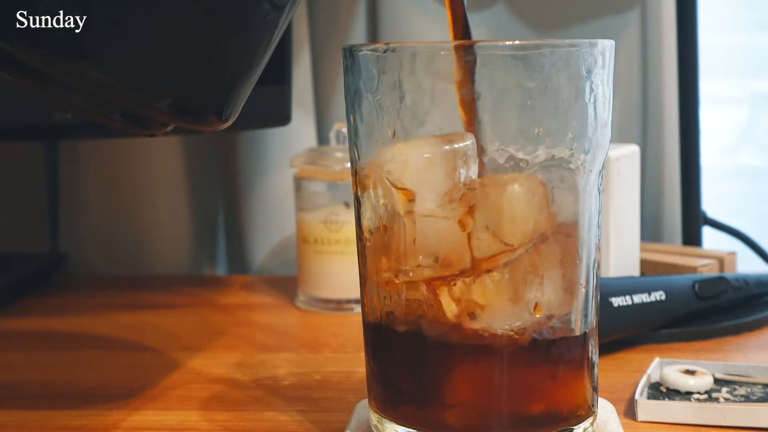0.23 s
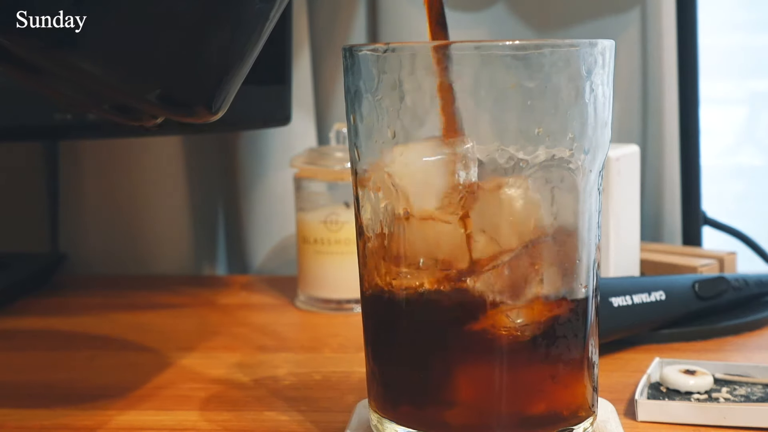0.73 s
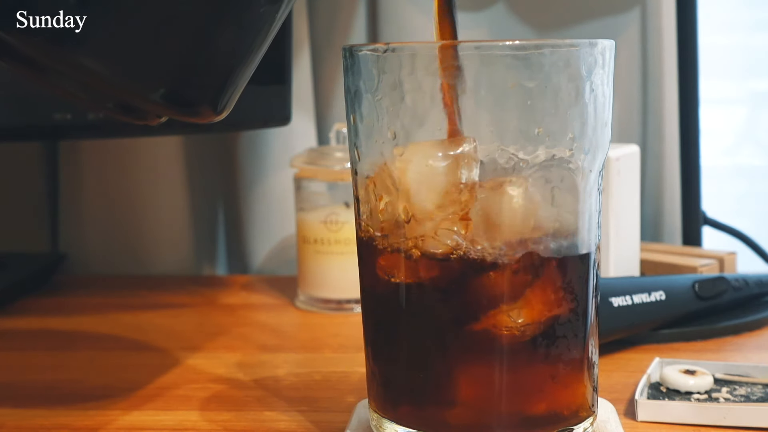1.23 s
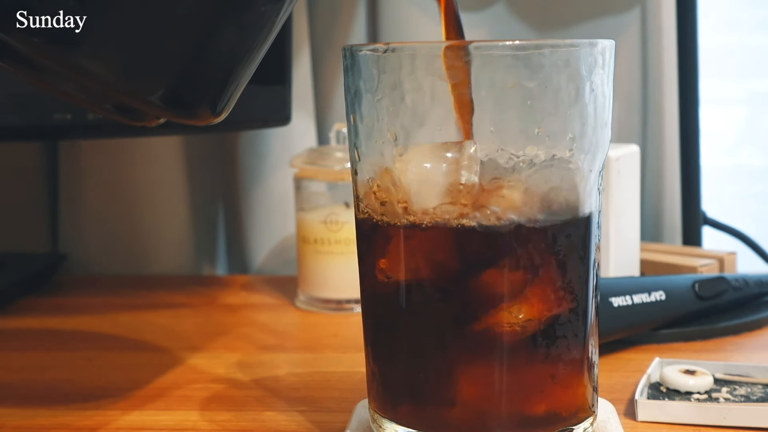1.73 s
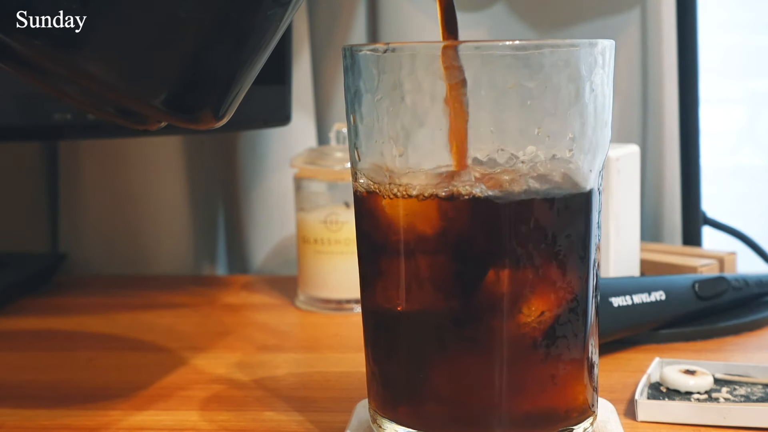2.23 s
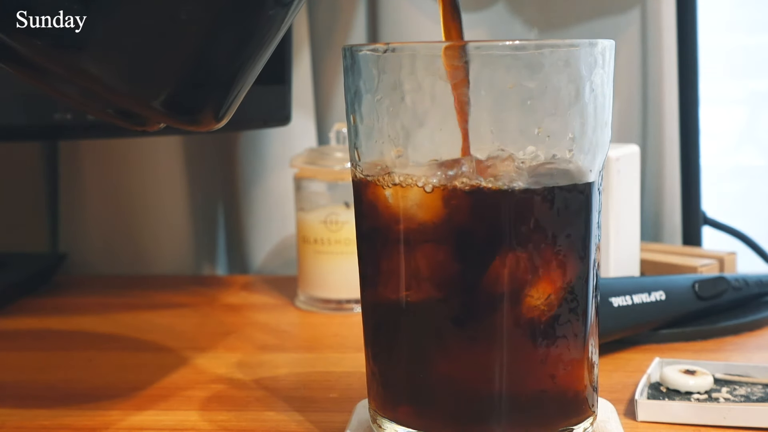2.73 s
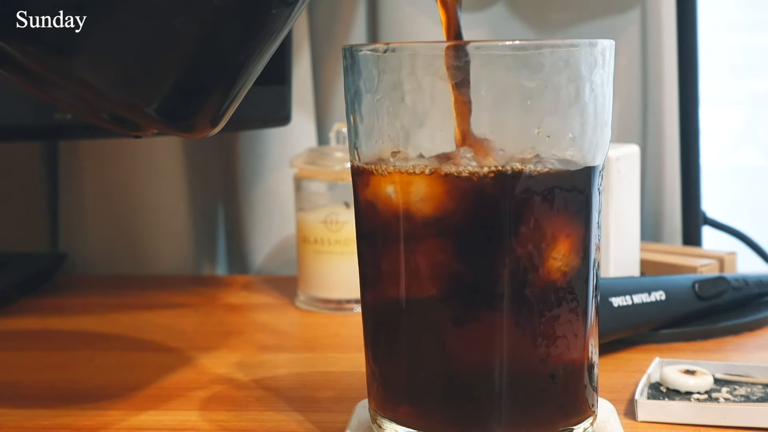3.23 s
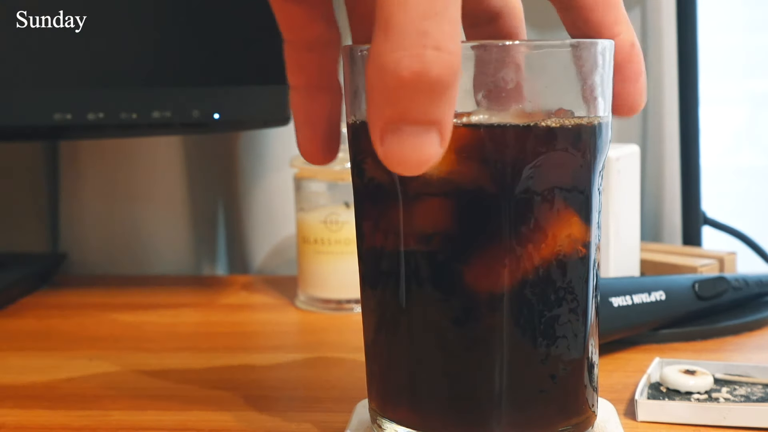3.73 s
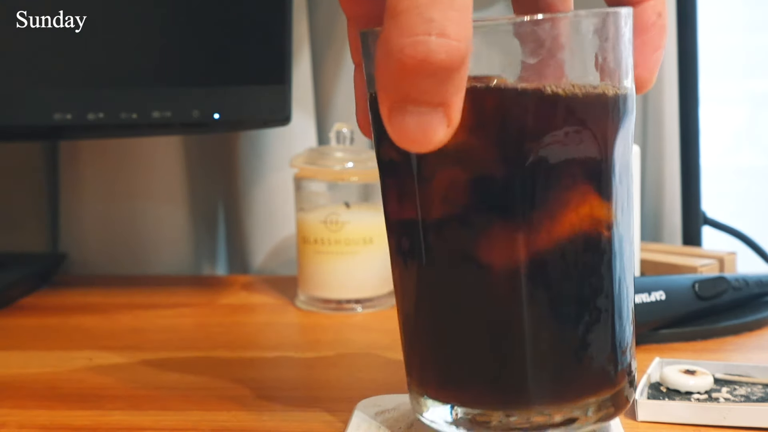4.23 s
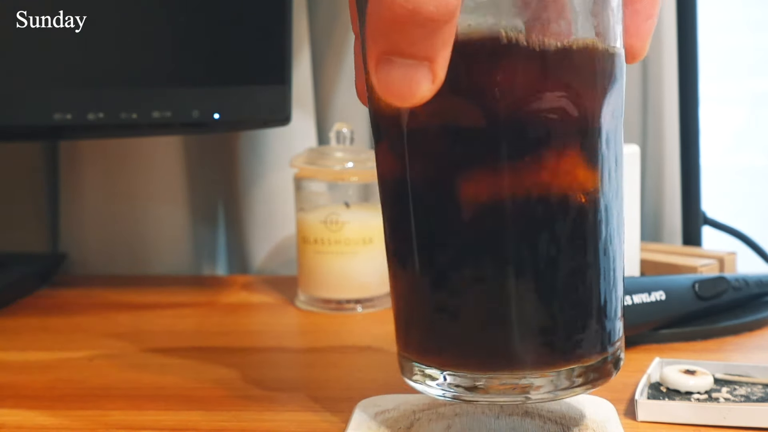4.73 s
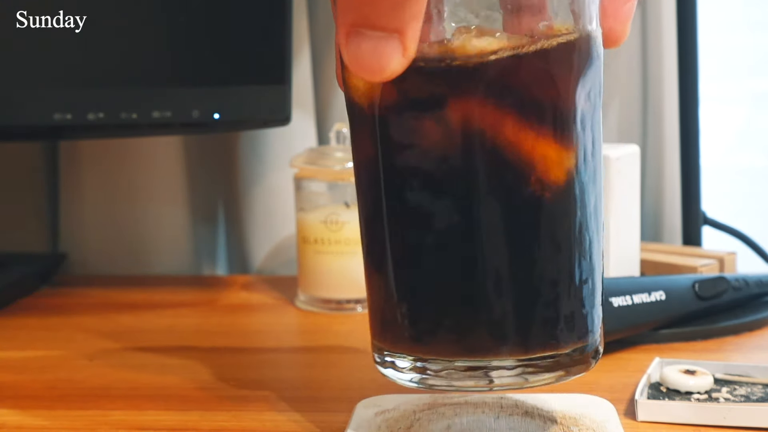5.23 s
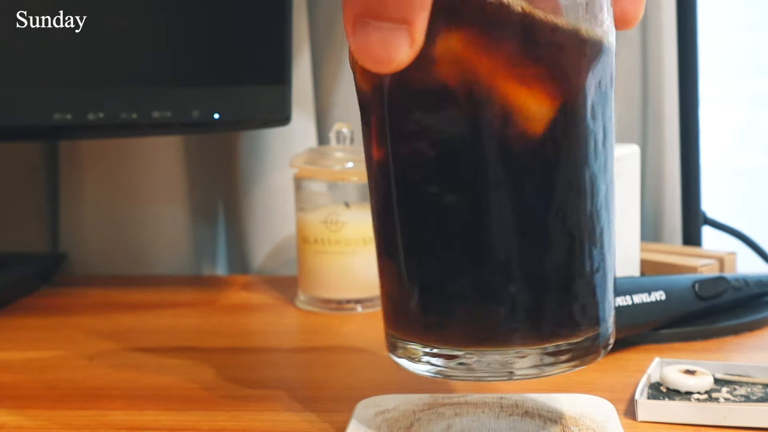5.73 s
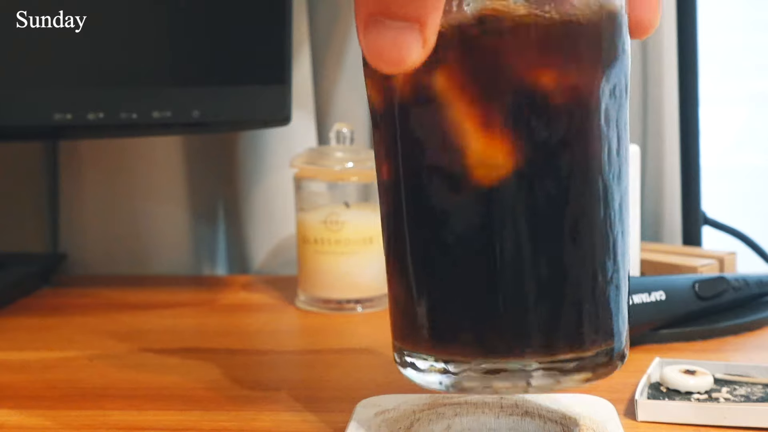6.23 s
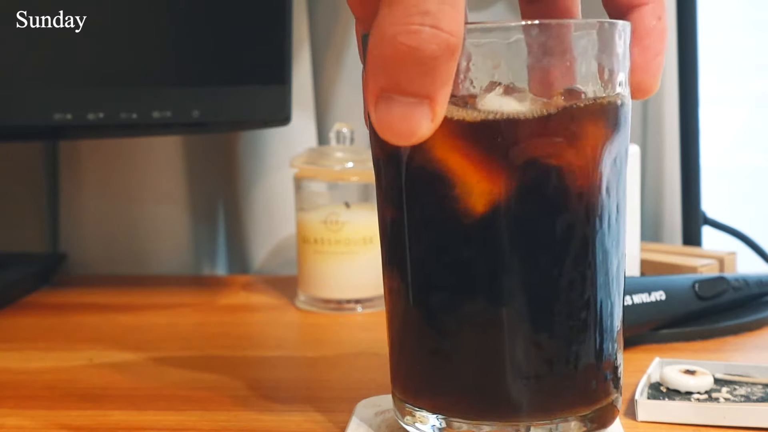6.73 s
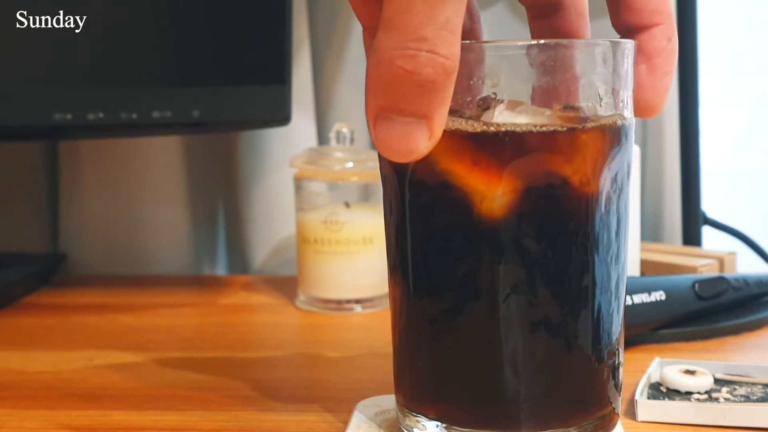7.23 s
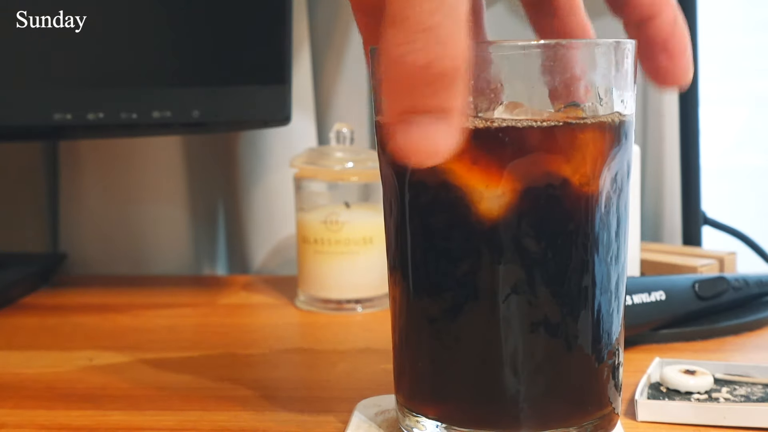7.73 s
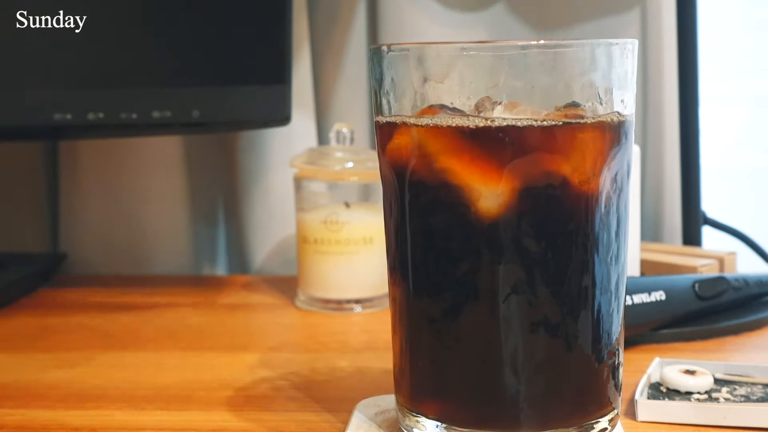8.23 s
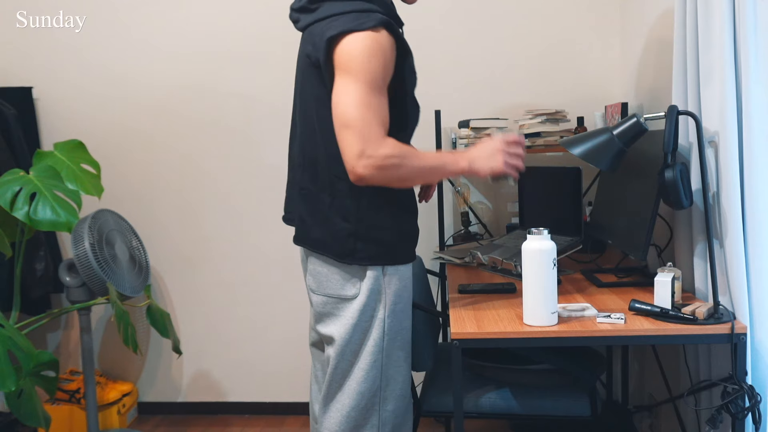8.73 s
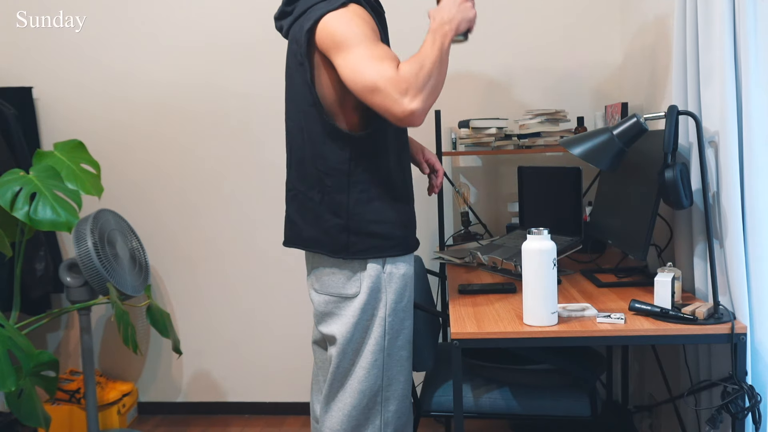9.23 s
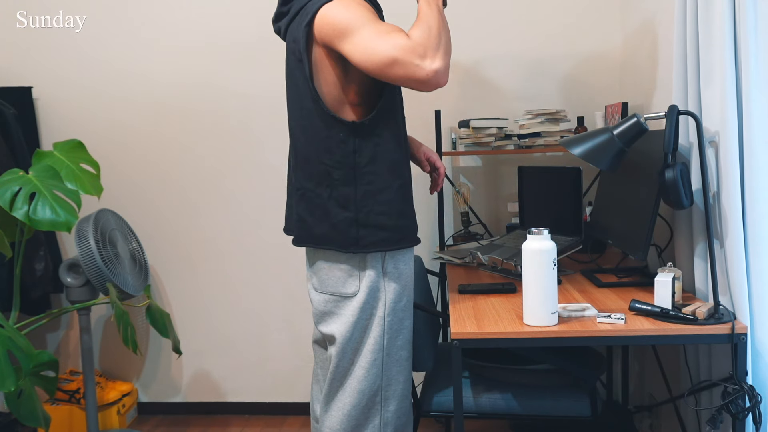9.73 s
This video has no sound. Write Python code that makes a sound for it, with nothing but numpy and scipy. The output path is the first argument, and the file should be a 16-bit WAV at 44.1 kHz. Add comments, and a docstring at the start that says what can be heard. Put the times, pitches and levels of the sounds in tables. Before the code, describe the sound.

Close-up iced drink pour with bubbling and fizzing spray, a thumb tap, vigorous glassy ice swirling, a coaster thump, then soft ice clinks across a room.

```python
"""Ice clinks against the wall of a tall glass, swirled so close to the microphone that it overloads the input.
Before that, a dark drink is poured over the cubes on a wooden desk: the stream gurgles, spits and sprays, cubes
slip, and a finger taps the glass. The glass also thumps its coaster. Last, ice tinkles across the small room.
Glass and desk are decaying sines, ice contacts are noise bursts through resonances, the drink is random drops
and bubbles, and the room is coloured noise."""
import sys
import numpy as np
from scipy import signal
from scipy.fft import rfft, irfft
from scipy.io import wavfile

SR = 44100
rng = np.random.default_rng(int(sys.argv[2]) if len(sys.argv) > 2 else 0)


def generate_wav(sig):
    """Save sig (samples, or channels by samples) to the path in sys.argv[1] as 16-bit PCM at SR."""
    pcm = np.round(np.clip(np.atleast_2d(sig).T, -1, 1) * 32767).astype(np.int16)
    wavfile.write(sys.argv[1], SR, pcm)


N = 441000
TIME = np.arange(N) / SR   # s

# All levels in the tables are relative, within their own layer.
# room noise of a brief quieter opening, stepping up at about 0.1 s to that at the desk: [time_s, level_db]
AIR_LEVEL = [(0, -11.5), (.098, -7), (.106, 0.2)]
# rumble and hiss at the desk, then across the room: [pitch_hz, density_db_per_hz]
NEAR_LOW = [(30, -29), (48, -9), (62, -1), (100, -8), (143, 3), (180, -4.5), (235, 0), (330, -6.5),
            (450, -15.5), (560, -29.5), (700, -39)]
NEAR_HISS = [(500, -4.5), (700, -3), (950, 4), (1200, -2.5), (1500, 5), (2400, 1.5), (3300, -4.5),
             (6000, -6.5), (15500, -5.5)]
FAR_LOW = [(30, -26), (50, -7.5), (100, -4), (145, -0.5), (200, 1), (290, -1), (380, -8.5), (480, -12),
           (580, -25.5), (720, -38.5)]
FAR_HISS = [(500, 4), (720, 5), (950, 15.5), (1400, 19), (1900, 13.5), (2500, 10), (3400, 3), (6000, -8),
            (15500, -1.5)]
MAINS_HZ, ACROSS_ROOM_S = 50.2, 8.31

# cubes slipping in the nearly empty glass: [start_s, contact_db, wall_ring_db, base_thump_db]
SLIPS = [(0.216, 5, -20.5, -15), (0.286, -14, -54, -24), (0.445, 1.5, -18.5, -26.5), (1.024, -16, -31, -44),
         (1.074, -12.5, -40, -50)]
# wall of the nearly empty glass: [pitch_hz, level_db, t60_s]
EMPTY_GLASS = [(1766, -13, 0.13), (4019, 8, 0.11), (6560, -7, .025), (7100, -24, 0.12),
               (9950, -13.5, 0.064)]
# the glass rocking on its base, with the air inside it: [pitch_hz, level_db, t60_s]
BASE_MODES = [(163, -7, 0.12), (237, -3, 0.13), (319, 1.5, 0.23), (461, -4, 0.078), (967, 5, 0.044),
              (1049, 6, 0.074), (1210, -1, 0.075)]
# the stack of cubes and the air around it: [pitch_hz, width_hz, level_db]
STACK = [(950, 70, 3), (1210, 70, -2), (1756, 204, 7.5), (2520, 310, 2), (3200, 360, -6), (3700, 800, -11),
         (6330, 440, -11.5)]

# the stream wavers, plunging into the drink or spattering on a cube:
# [centre_s, half_length_s, gurgle_rise_db, spray_rise_db]
SURGES = [(0.1, .03, 10, -4), (0.198, .03, 5.5, 8), (0.567, 0.045, 3, -1.5), (0.822, 0.037, 13.5, 1),
          (0.923, 0.11, -9, 8), (1.424, .08, 7, -1.5), (1.604, 0.017, 7, 14), (1.74, 0.059, 3, 16.5),
          (1.92, 0.16, 16, 4.5), (2.292, 0.042, 6, 13), (2.623, 0.15, -1, 5), (2.987, 0.075, 8.5, 6.5),
          (3.335, 0.073, 13.5, 7)]
# air above the drink: [pitch_hz, width_hz, level_db]
CAVITY = [(896, 127, -6), (1059, 65, 1.5), (1210, 57, 5), (1510, 91, 0), (1710, 80, 0), (2050, 140, -9),
          (3300, 250, -8)]
# fizz of the spray: [pitch_hz, density_db_per_hz]
SPRAY_SPECTRUM = [(4700, -12), (5300, -8), (5700, -19), (6250, 6.5), (6900, -19), (7550, 2.5), (7900, -8),
                  (8500, 1), (10000, -3.5), (13000, -6.5), (16000, -39)]
# the largest gulps of air dragged under: [start_s, level_db, pitch_hz]
GULPS = [(0.5584, -19, 1070), (0.782, -22, 1110), (0.9048, -19, 2550), (1.107, -18.5, 3000),
         (1.1453, -23, 1760), (1.3354, -18.5, 2690), (1.4157, -19.5, 1210), (1.457, -21, 1210),
         (1.492, -16, 1210), (1.702, -19.5, 1080), (1.8312, -14.5, 1190), (1.8614, -12.5, 2980),
         (1.9215, -18, 1610), (1.937, -14, 3760), (2.0184, -22, 1650), (2.9555, -12.5, 1104),
         (3.043, -18.5, 1470), (3.251, -21.5, 1480), (3.3406, -17, 1210), (3.3734, -20, 1470)]
# the loudest drops spitting off the ice: [start_s, level_db]
SPITS = [(0.618, -20.5), (0.658, -23), (0.9416, -20), (1.7524, -15), (1.7714, -20), (2.9483, -20),
         (3.3199, -15.5)]
SPIT_CENTRE_HZ = 6280
POUR_START_S, POUR_END_S = .103, 3.396
# levels of the stream between surges (dB); the spray level is that before its drops and fizz are balanced
GURGLE_DB, BUBBLE_DB, SPRAY_DB = -47.5, -44.5, -53
# bubble pings fade as the glass fills: from (s), rate (dB per s), share of a surge's dB that they follow
BUBBLES_FADE_S, BUBBLE_FADE_DB_PER_S, BUBBLE_FOLLOWS = 1.1, 4.5, 0.27

# thumps of the desk, under the finger tap (first row), then as glass meets coaster: [start_s, level_db]
THUDS = [(3.954, -26), (7.002, -12), (7.0098, -15)]
# desk top: [pitch_hz, level_db, t60_s]
DESK_MODES = [(87, -18.5, 0.98), (144.3, -1, 0.19), (226, -2.5, .09), (293.4, -4, 0.11),
              (362, -13.5, 0.074), (470, -13, 0.082), (685, -14.5, .02), (920, -11.5, 0.011)]

# a finger tap on the glass (first row), then clear blows of ice on the full glass:
# [start_s, knock_db, wall_ring_db, upper_ring_over_wall_ring_db]
CLINKS = [(3.956, -30.5, -43, 6), (4.1698, -41, -38.5, -2), (4.2275, -26.5, -19.5, 2),
          (4.2703, -25, -15, -2.5), (4.3242, -28, -13.5, -12), (4.4028, -12, -11.5, -5),
          (4.4229, -14, -10.5, 6), (4.444, -9, -21, -4), (4.4748, -14, -21, -13), (4.521, -0.5, -16.5, 0),
          (4.5425, -16, -14.5, -8), (4.5682, -8, -1, -1.5), (4.5801, -10, 0, -2.5),
          (4.6497, -22, -15.5, -2.5), (4.673, -11.5, -6.5, -1), (4.7026, -2, -7.5, -9),
          (4.7254, -5.5, -1, -12), (4.7375, -9.5, -13, -27), (4.7906, -17, -17, 6.5), (4.8124, -8, -13, -1),
          (4.8305, -18, -16, 6), (4.86, -23, -15, -3), (4.89, -5.5, -12, -5), (4.9362, -7.5, -11, -4),
          (5.0144, -16.5, -22.5, -10), (5.0528, -7, -24, -5), (5.1151, -13, -14.5, -2),
          (5.1989, -10, -20, -15), (5.2281, -18, -9.5, -3.5), (5.3194, -11.5, -18, -14),
          (5.3567, -18, -17.5, -3), (5.4145, -14.5, -24, -12), (5.4561, -11.5, -13.5, -2),
          (5.5239, -10, -11, 0.5), (5.5631, -22, -28, -13), (5.6055, -23, -19.5, -1), (5.631, -22, -16, 0),
          (5.661, -16, -6.5, 0.5), (5.6984, -19, -5, -5), (5.7584, -5, -11, 6.5), (5.7918, -1.5, -13.5, -7),
          (5.8428, -12, -10, 0), (5.872, -28.5, -15.5, 13.5), (5.9488, -24, -14.5, 15.5),
          (5.9831, -17.5, -8, 2.5), (6.0609, -2.5, -15.5, -22), (6.0817, -22, -8, -4),
          (6.142, -10, -11.5, -5), (6.1709, -15, -17, 11), (6.1913, -8.5, -26, -5), (6.2402, -15, -7.5, 1),
          (6.2492, -17.5, 2, 1), (6.2921, -5.5, -9, -16), (6.3092, -7, -16, -4), (6.398, -34, -6.5, 0.5),
          (6.4192, -5.5, -8.5, 7), (6.5148, -28, -14.5, 0), (6.534, -24, -10.5, 5.5),
          (6.5827, -13, -9.5, -13), (6.6031, -21, -12.5, -8), (6.625, -6, -26, -12),
          (6.6619, -26, -13, -1.5), (6.7492, -22, -20.5, -13), (6.8149, -21, -17, -34),
          (6.8565, -33, -24, -11), (6.9066, -18, -15.5, -9), (6.9521, -12, -22.5, 0),
          (7.0582, -32, -15, -21), (7.1402, -36, -32, -7), (7.176, -33, -23.5, -21), (7.1973, -24, -29, -5),
          (7.3236, -38, -34.5, -8), (7.5996, -34, -41, -19)]
# the swirl starts, is under way, slackens, stops: [time_s]
SWIRL_S = [4.1, 4.45, 6.6, 7.2]
# wall of the full glass, pitch and t60 scattered from blow to blow: [pitch_hz, level_db, t60_s]
FULL_GLASS = [(1341.7, 7.5, 0.11), (1617, -6, 0.043), (2364, -10, 0.054), (3170, 8, 0.034),
              (3160, -21.5, .13), (4753, 2.5, 0.017), (5032, -1.5, 0.024), (5800, -19.5, .025),
              (8050, -18.5, 0.025), (9820, -24.5, 0.023)]
# the wall's main pitch as the drink is tilted, before scatter: [time_s, pitch_hz]
WALL_PITCH = [(4.3, 3220), (5.8, 3180), (6.1, 3130), (7.1, 3157)]
SLOSH = 0.032   # share by which sloshing scatters the main pitch
# the dead knock of a blow: [pitch_hz, width_hz, level_db]
KNOCK_MODES = [(1560, 400, -13), (2520, 540, -3), (3250, 500, 4), (5100, 1000, -7), (8300, 1500, -18.5)]
# added to each blow's knock, main ring and upper ring (dB)
KNOCK_DB, RING_DB, UPPER_DB = 9.5, -6, -4
# the wall's lowest mode: level (dB) and the share of a blow's ring dB that it follows
LOW_RING_DB, LOW_RING_FOLLOWS = -18, .72
# rebound after a blow: centre delay (s), loss of knock and of ring (dB) before scatter
REBOUND_S, REBOUND_KNOCK_LOSS_DB, REBOUND_RING_LOSS_DB = .014, 9.5, 13
# a light touch on the wall falls within this window after the blow (s)
TOUCH_FROM_S, TOUCH_UNTIL_S = .018, .045
# light touches on the scale of CLINKS: knock, ring and their spread (dB)
TOUCH_KNOCK_DB, TOUCH_RING_DB, TOUCH_SPREAD_DB = -21.5, -28, 6

# ice heard from across the room: [start_s, level_db, brightness_db]
FAR_CLINKS = [(8.3147, -39, -5.5), (8.522, -28, -20.5), (8.7, -25, -4.5), (8.8835, -21.5, -30),
              (8.9411, -29.5, -20), (8.98, -28, -3.5), (9.178, -22.5, -5), (9.2792, -34.5, -10),
              (9.387, -22.5, -29), (9.9555, -35.5, -28)]
# the glass held in the hand: [pitch_hz, width_hz, level_db]
HELD_GLASS = [(1256, 60, -14), (3080, 260, 5), (4810, 190, 11), (5160, 340, 7.5), (5610, 320, 8),
              (8540, 860, -5.5)]
CUTOFF_HZ = 16000   # top of the microphone chain


def from_db(db):
    """Decibels to gain."""
    return 10 ** (np.asarray(db) / 20)


def rms_one(x):
    """Scale to unit rms."""
    return x / np.sqrt(np.mean(x ** 2) + 1e-20)


def at_hz(points, hz):
    """Read a spectrum on a log-frequency axis."""
    pitch_hz, db = np.transpose(points)
    return np.interp(np.log(hz + 0.0011), np.log(pitch_hz), db)


def add(track, s, sound):
    """Mix a sound into a track at time s."""
    i = max(0, round(s * SR))
    track[i:i + len(sound)] += sound[:max(0, N - i)]


def dying(t60):
    """An exponential fade that drops 60 dB in t60 seconds."""
    return from_db(-60 * TIME[:int(1.2 * t60 * SR) + 2] / t60)


def ping(hz, t60, rise=0):
    """A decaying sine; a positive rise bends the pitch upward, as for a bubble nearing the surface."""
    fade = dying(t60)
    t = TIME[:len(fade)]
    return fade * np.sin(2 * np.pi * hz * t * (1 + rise * t / t60))


def contact(t60):
    """A decaying noise burst of unit energy, for the micro-contacts of one touch."""
    fade = dying(t60)
    burst = fade * rng.standard_normal(len(fade))
    return burst / np.sqrt(np.sum(burst ** 2))


def cut(x, hz, kind, order=2):
    """Butterworth high- or low-pass."""
    sections = signal.butter(order, min(hz, .45 * SR), kind, fs=SR, output="sos")
    return signal.sosfilt(sections, x + 1e-18)


def resonate(x, modes):
    """Parallel two-pole resonances with alternating signs."""
    out = 0
    for k, (hz, width, db) in enumerate(modes):
        r = np.exp(-np.pi * width / SR)
        poles = [1, -2 * r * np.cos(2 * np.pi * hz / SR), r * r]
        gain = (-1) ** k * from_db(db) * (1 - r * r) / 2
        out = out + gain * signal.lfilter([1, 0, -1], poles, x + 1e-18)
    return out


def coloured(x, spectrum):
    """Give a steady sound a spectrum; rms 1."""
    bins_hz = np.arange(N // 2 + 1) * SR / N
    return rms_one(irfft(rfft(x) * from_db(at_hz(spectrum, bins_hz)), N))


def grains(per_s, spread_db):
    """Random clicks of uneven size and either sign."""
    sizes = from_db(spread_db * np.minimum(rng.exponential(1, N), 3.5))
    signs = rng.choice([-1, 1], N)
    return sizes * signs * (rng.random(N) < per_s / SR)


def blips(low_hz, high_hz, per_s, cycles, rise, count):
    """Random short rings at a spread of pitches, per_s of each; rms 1."""
    total = np.zeros(N)
    for hz in np.geomspace(low_hz, high_hz, count):
        total += signal.oaconvolve(grains(per_s, spread_db=4.5), ping(hz, cycles / hz, rise))[:N]
    return rms_one(total)


def echoes(x, t60, delay_s, dull_hz):
    """Diffuse reflections that start after a short gap, with their treble softened."""
    tail = np.concatenate([np.zeros(int(delay_s * SR)), contact(t60)])
    return cut(signal.oaconvolve(x, tail)[:N], dull_hz, "low", order=1)


def room_air():
    """Rumble, hum and hiss: a brief quieter opening steps up to the desk; across the room there is no hum."""
    white = rng.standard_normal((2, N))
    near = from_db(-40) * coloured(white[0], NEAR_LOW) + from_db(-51) * coloured(white[1], NEAR_HISS)
    far = from_db(-35) * coloured(white[0], FAR_LOW) + from_db(-47) * coloured(white[1], FAR_HISS)
    hum = from_db(-49) * np.sin(2 * np.pi * MAINS_HZ * TIME)
    level = from_db(np.interp(TIME, *np.transpose(AIR_LEVEL)))
    return level * np.where(TIME < ACROSS_ROOM_S, near + hum, far)


def slipping_ice():
    """Loosened cubes drop against the wall and rattle to rest; wall and base ring as decaying modes."""
    wall, rattle = np.zeros(N), np.zeros(N)
    # the wall is still faintly ringing at the start
    add(wall, 0, from_db(-41.5) * ping(EMPTY_GLASS[0][0], 0.48))
    for s, db, ring_db, thump_db in SLIPS:
        add(rattle, s, from_db(db) * contact(0.0087))
        # a harder drop rattles on more strongly
        add(rattle, s + .004, from_db(1.12 * db - 3.5) * contact(0.16))
        for hz, mode_db, t60 in EMPTY_GLASS:
            add(wall, s, from_db(ring_db + mode_db) * ping(hz, t60))
        for k, (hz, mode_db, t60) in enumerate(BASE_MODES):
            add(wall, s + 0.002, (-1) ** k * from_db(thump_db + mode_db) * ping(hz, t60))
    return wall + from_db(19.5) * cut(resonate(rattle, STACK), 690, "high")


def surging(t):
    """Rise of gurgle and of spray at time t, in dB: each surge swells and ebbs like a bell curve."""
    rises = np.zeros((2, len(t)))
    for s, half_s, gurgle_db, spray_db in SURGES:
        bell = np.exp(-((t - s) / half_s) ** 2)
        rises += np.multiply.outer([gurgle_db, spray_db], bell)
    return rises


def stream():
    """Entrained air excites the cavity, bubbles ping, and drops on bare ice yield to fizz as it is covered."""
    plunge_db, spatter_db = surging(TIME)
    filling_s = np.maximum(TIME - BUBBLES_FADE_S, 0)
    bubble_db = BUBBLE_DB - BUBBLE_FADE_DB_PER_S * filling_s + BUBBLE_FOLLOWS * plunge_db
    edges_s = [POUR_START_S - .002, POUR_START_S, POUR_END_S, POUR_END_S + 0.0021]
    running = np.interp(TIME, edges_s, [0, 1, 1, 0])
    air = rms_one(cut(resonate(grains(per_s=400, spread_db=4), CAVITY), 700, "high", order=4))
    pings = blips(2210, 3950, per_s=34, cycles=33, rise=.012, count=12)
    drops = blips(5160, 9300, per_s=14, cycles=55, rise=.02, count=10)
    fizz = coloured(grains(per_s=1400, spread_db=5), SPRAY_SPECTRUM)
    covered = np.interp(TIME, [1.3, 1.7], [0, 1])
    treble = (1 - 0.36 * covered) * drops + (0.63 + 0.5 * covered) * fizz
    gurgle = from_db(GURGLE_DB + plunge_db) * air
    bubbles = from_db(bubble_db) * pings
    spray = from_db(SPRAY_DB + spatter_db) * treble
    return running * (gurgle + bubbles + spray)


def splashes():
    """Each gulp or drop rings as a bubble of rising pitch; gulps also pop the air in the glass."""
    rings, pops = np.zeros(N), np.zeros(N)
    for s, db, hz in GULPS:
        add(rings, s, from_db(db) * ping(hz, 0.033, rise=0.018))
        add(pops, s, from_db(db) * contact(0.031))
    for s, db in SPITS:
        hz = SPIT_CENTRE_HZ * np.exp(.04 * rng.standard_normal())
        add(rings, s, from_db(db - 6) * ping(hz, 0.023, rise=0.018))
    cavity_pops = cut(resonate(pops, CAVITY), 590, "high", order=4)
    return cut(rings, 1190, "high") + from_db(23) * cavity_pops


def desk():
    """The tapped or landing glass thumps the desk top's modes through the coaster, which shudders briefly."""
    out, shudder = np.zeros(N), np.zeros(N)
    for s, db in THUDS:
        add(shudder, s, from_db(db) * contact(0.34))
        for k, (hz, mode_db, t60) in enumerate(DESK_MODES):
            add(out, s, (-1) ** k * from_db(db + mode_db) * ping(hz, t60))
    return out + from_db(39) * cut(cut(shudder, 324, "low", order=4), 150, "high")


def swirl_effort(t):
    """How hard the glass is swirled, 0 to 1."""
    return np.interp(t, SWIRL_S, [0, 1, 1, 0])


def rebounds():
    """Each blow bounces once, more weakly when the swirl is slack: rows like CLINKS."""
    s, knock_db, ring_db, upper_db = np.transpose(CLINKS)
    delay, force = rng.uniform(-1, 1, (len(s), 2)).T
    force_db = 3 * force - 14 * (1 - swirl_effort(s))
    return np.column_stack([s + REBOUND_S * (1 + .35 * delay),
                            knock_db - REBOUND_KNOCK_LOSS_DB + force_db,
                            ring_db - REBOUND_RING_LOSS_DB + force_db,
                            upper_db])


def light_touches():
    """After each blow jolted cubes brush the wall once, as hard as the swirl drives them: rows like CLINKS."""
    s = np.array(CLINKS)[:, 0]
    when, knock, ring, upper = rng.uniform(-1, 1, (len(s), 4)).T
    slack_db = 24 * (1 - swirl_effort(s))
    return np.column_stack([s + np.interp(when, [-1, 1], [TOUCH_FROM_S, TOUCH_UNTIL_S]),
                            TOUCH_KNOCK_DB + TOUCH_SPREAD_DB * knock - slack_db,
                            TOUCH_RING_DB + TOUCH_SPREAD_DB * ring - slack_db,
                            TOUCH_SPREAD_DB * upper - 6])


def struck_glass():
    """Finger tap and ice blows: a dead knock plus the wall's modes, pitches scattered by the sloshing drink."""
    wall, knocks = np.zeros(N), np.zeros(N)
    blows = np.vstack([CLINKS, rebounds(), light_touches()])
    chance = rng.uniform(-0.94, 1, (len(blows), len(FULL_GLASS), 2))
    for (s, force_db, ring_db, upper_db), draws in zip(blows, chance):
        knock_db = force_db + KNOCK_DB
        touch = 0.82 * contact(0.0059)
        touch[0] += .8   # sharp first click
        # a harder blow is a shorter contact, so it is brighter
        add(knocks, s, from_db(knock_db) * cut(touch, 7000 * 2 ** (knock_db / 26), "low"))
        # each blow has a clack of its own pitch
        clack_hz = 2520 * np.exp(0.028 * rng.standard_normal())
        add(wall, s, from_db(knock_db - 10) * ping(clack_hz, 0.018))
        strength = [(1340, LOW_RING_DB + LOW_RING_FOLLOWS * ring_db),
                    (3170, RING_DB + ring_db),
                    (5000, UPPER_DB + ring_db + upper_db)]
        main_hz = np.interp(s, *np.transpose(WALL_PITCH))
        for (hz, mode_db, t60), (longer, sharper) in zip(FULL_GLASS, draws):
            if hz == FULL_GLASS[3][0]:   # the wall's main mode
                pitch_hz = main_hz * (1 + SLOSH * sharper)
            else:
                pitch_hz = hz * (1 + 0.033 * sharper)
            level = from_db(at_hz(strength, hz) + mode_db)
            add(wall, s, level * ping(pitch_hz, t60 * (1 + longer / 3)))
    # long waves slip round the glass, and wet ice is too soft for the very top
    blend = wall + from_db(13.5) * resonate(knocks, KNOCK_MODES)
    return cut(cut(blend, 1420, "high", order=6), 9500, "low", order=4)


def jostle(clinks):
    """Swirled cubes rub, and after each blow keep bumping: the clinks' recent energy drives dull, wet ticks."""
    memory = dying(0.16) ** 2
    recent_energy = signal.oaconvolve(np.tanh(clinks) ** 2, memory / np.sum(memory))[:N]
    stirred = np.sqrt(np.abs(recent_energy))
    bumps = blips(1995, 3300, per_s=14, cycles=11, rise=0, count=8)
    ticks = rms_one(resonate(grains(per_s=280, spread_db=1.5), KNOCK_MODES))
    texture = cut(from_db(-11) * bumps + from_db(-13.5) * ticks, 1600, "high", order=4)
    return (stirred + from_db(-40.5) * swirl_effort(TIME)) * texture


def far_ice():
    """Light, rough clinks with a short clear ring, heard both directly and by way of the walls."""
    touches, rings = np.zeros(N), np.zeros(N)
    low_hz, main_hz = HELD_GLASS[0][0], HELD_GLASS[1][0]
    for s, db, bright_db in FAR_CLINKS:
        add(touches, s, from_db(db + 0.7 * bright_db + 4) * contact(0.078))
        ring_hz = main_hz * (1 + 0.0081 * rng.standard_normal())
        add(rings, s, from_db(db - 3.5) * ping(ring_hz, 0.052))
        add(rings, s, from_db(db - 10.5 + 2 * rng.standard_normal()) * ping(low_hz, .1))
    direct = cut(rings + from_db(26) * resonate(touches, HELD_GLASS), 1230, "high")
    return direct + echoes(direct, t60=0.3, delay_s=0.004, dull_hz=11200)


def scene():
    """Sounds from glass and desk reach the room more than those inside the drink; both channels are alike."""
    clinks = struck_glass()
    solid = clinks + jostle(clinks) + slipping_ice() + desk()
    liquid = stream() + splashes()
    radiated = solid + from_db(-2) * liquid
    early = from_db(-13) * echoes(radiated, t60=0.2, delay_s=0.002061, dull_hz=7300)
    late = from_db(-12) * echoes(radiated, t60=0.34, delay_s=.009, dull_hz=6000)
    return np.tile(solid + liquid + early + late + far_ice() + room_air(), (2, 1))


def record(dry):
    """The hardest clinks overload the microphone input, which flattens smoothly; then the top is cut."""
    overloaded = dry / (1 + np.abs(dry / 1.02) ** 8) ** (1 / 8)
    low_pass = signal.ellip(10, .1, 70, CUTOFF_HZ, fs=SR, output="sos")
    return signal.sosfilt(low_pass, overloaded)


dry = scene()
out = record(dry)
generate_wav(out)
```